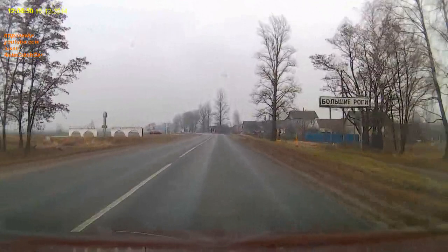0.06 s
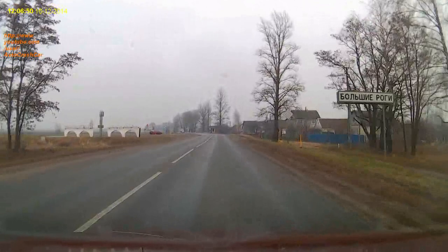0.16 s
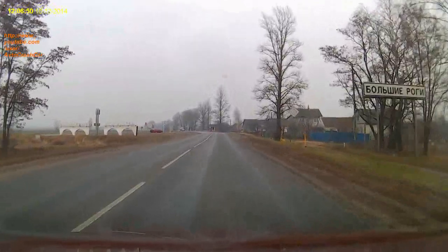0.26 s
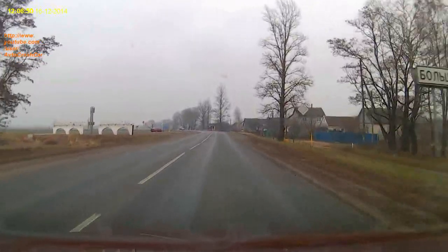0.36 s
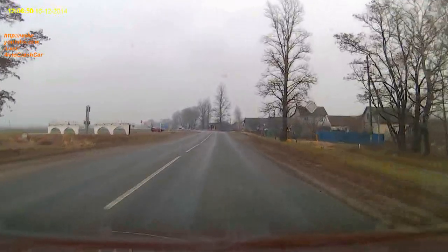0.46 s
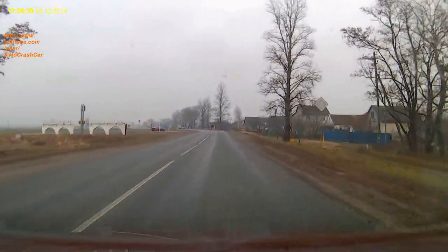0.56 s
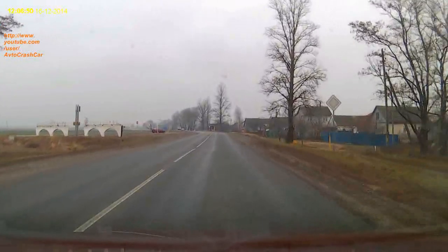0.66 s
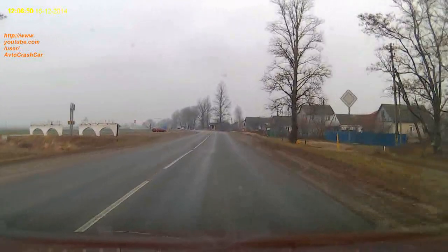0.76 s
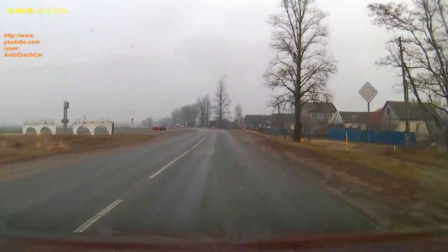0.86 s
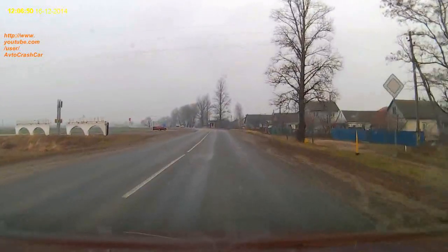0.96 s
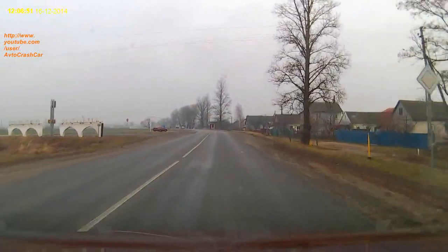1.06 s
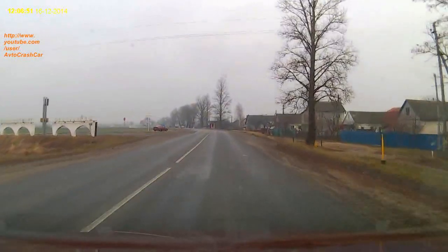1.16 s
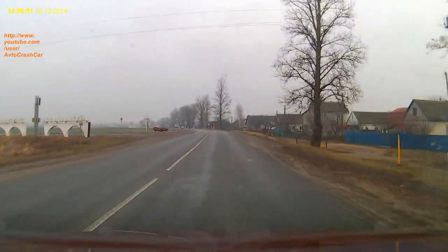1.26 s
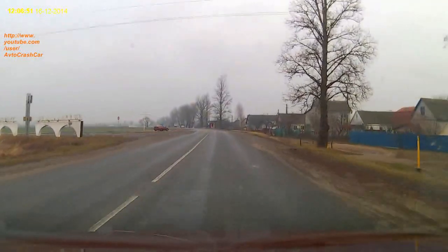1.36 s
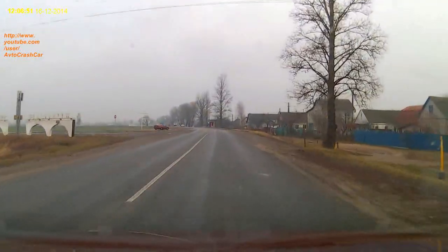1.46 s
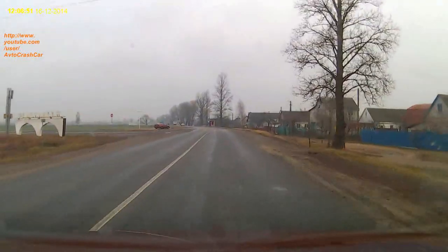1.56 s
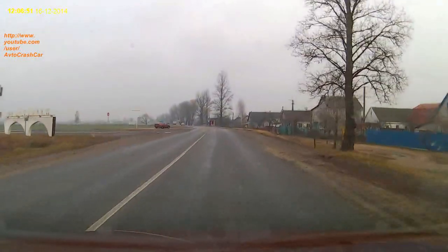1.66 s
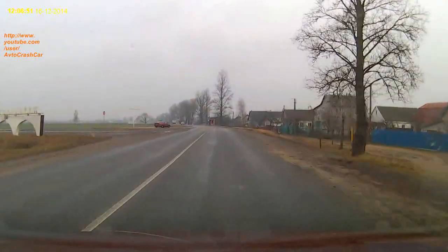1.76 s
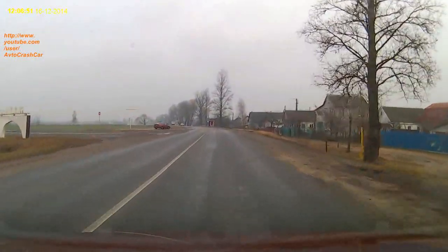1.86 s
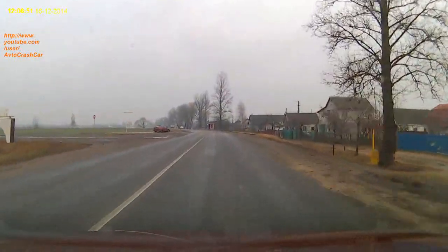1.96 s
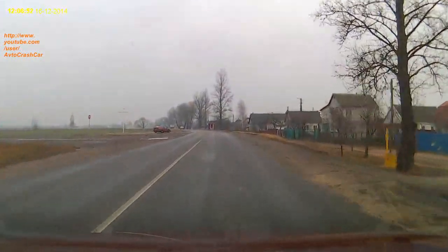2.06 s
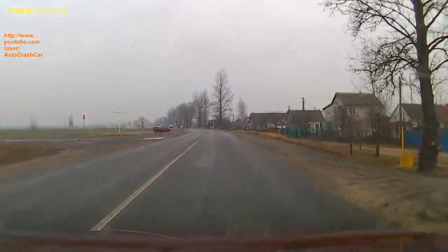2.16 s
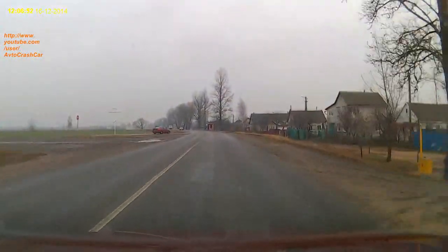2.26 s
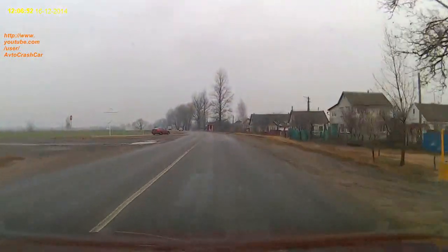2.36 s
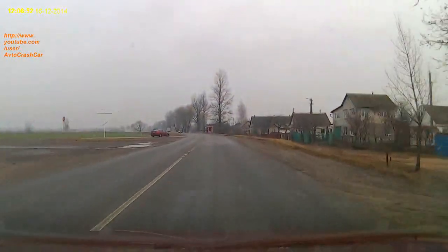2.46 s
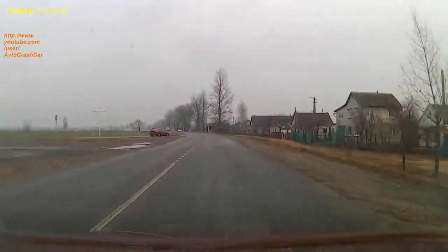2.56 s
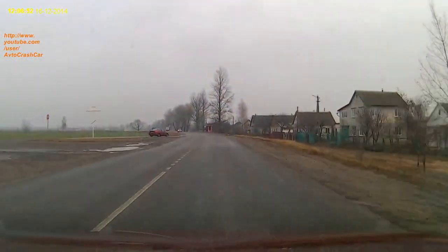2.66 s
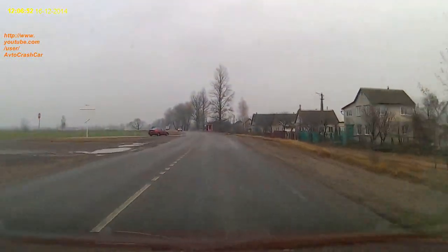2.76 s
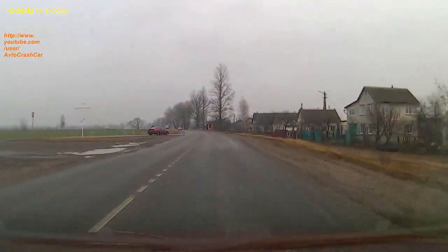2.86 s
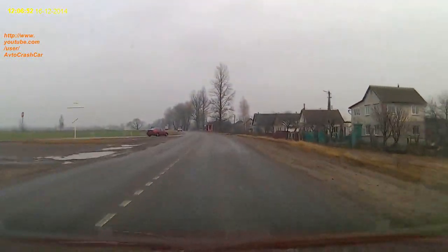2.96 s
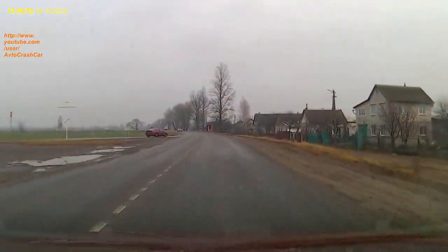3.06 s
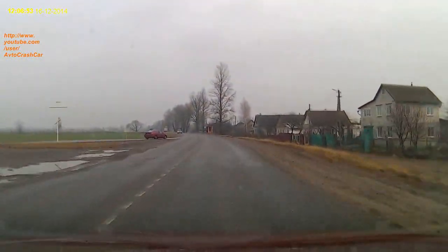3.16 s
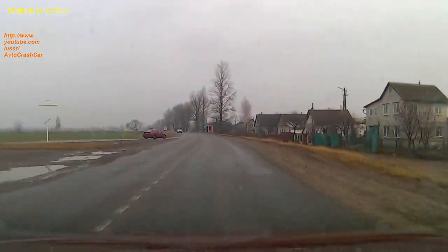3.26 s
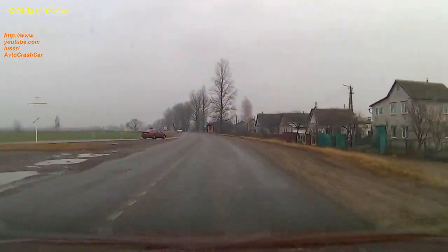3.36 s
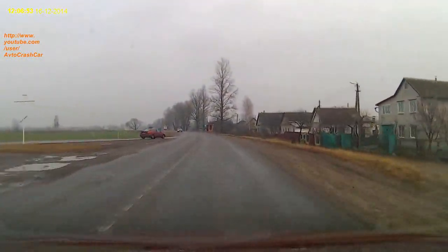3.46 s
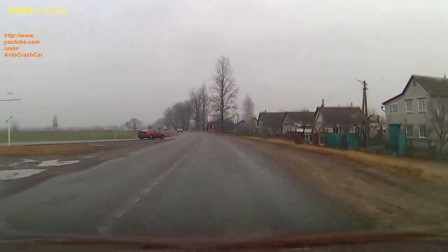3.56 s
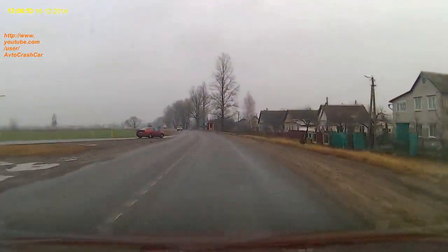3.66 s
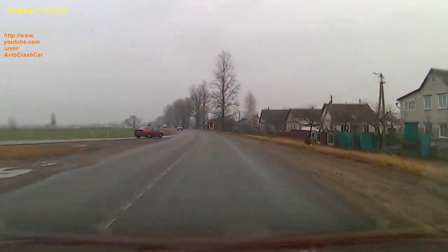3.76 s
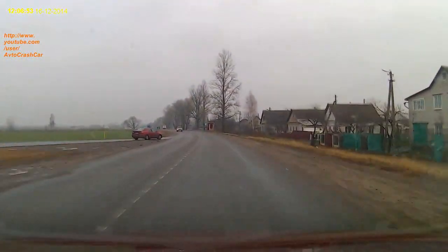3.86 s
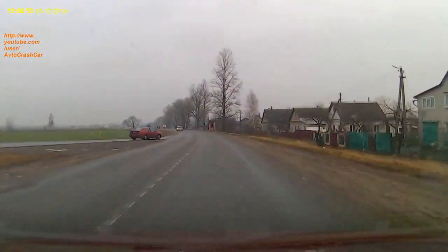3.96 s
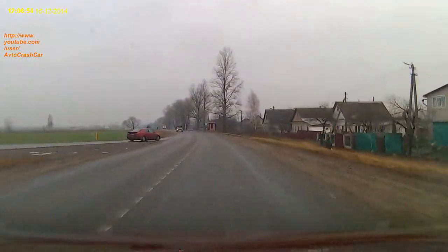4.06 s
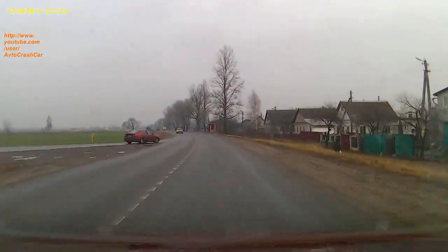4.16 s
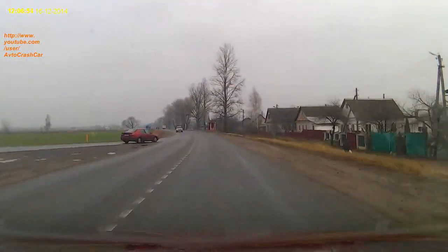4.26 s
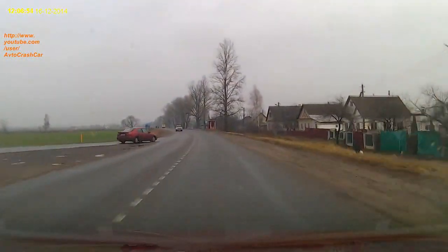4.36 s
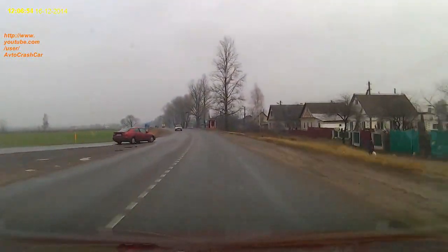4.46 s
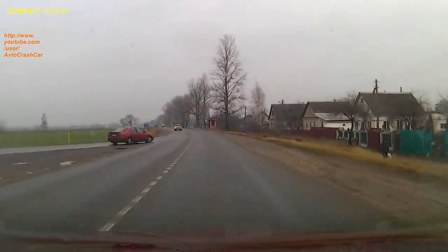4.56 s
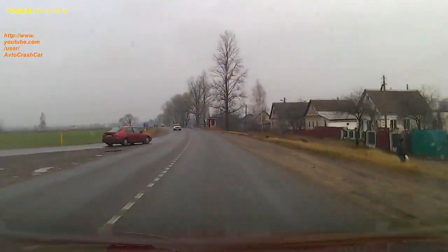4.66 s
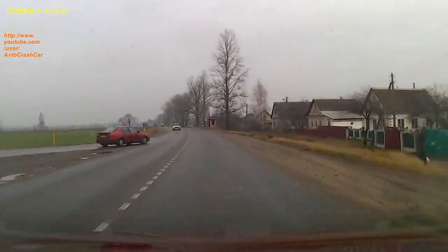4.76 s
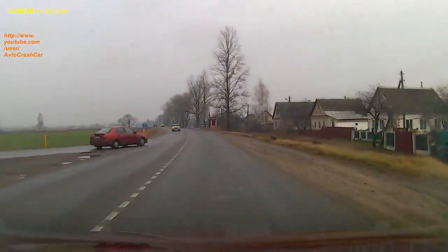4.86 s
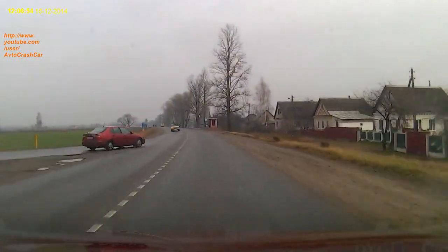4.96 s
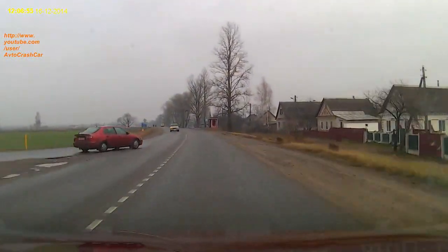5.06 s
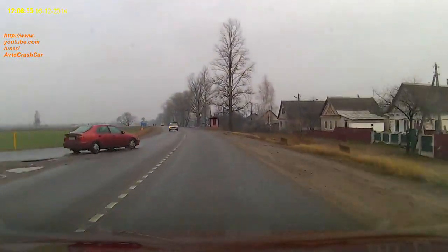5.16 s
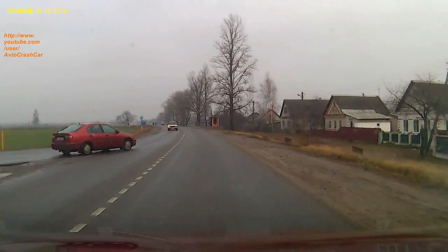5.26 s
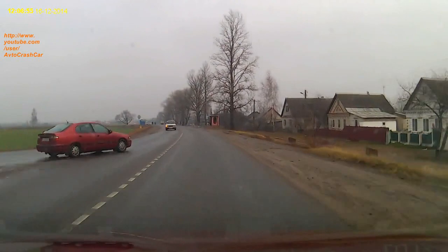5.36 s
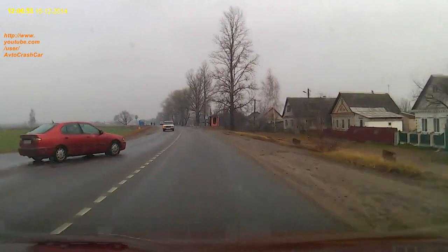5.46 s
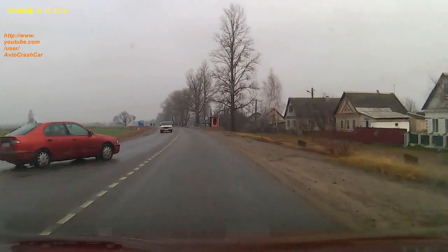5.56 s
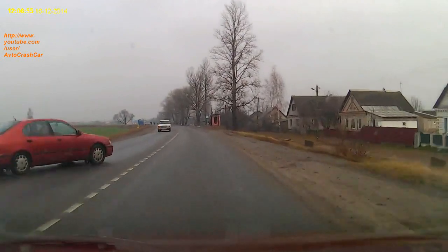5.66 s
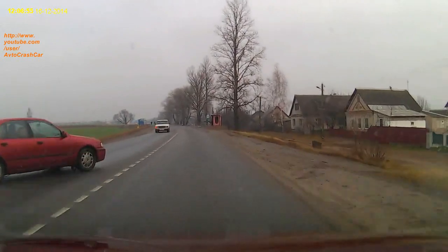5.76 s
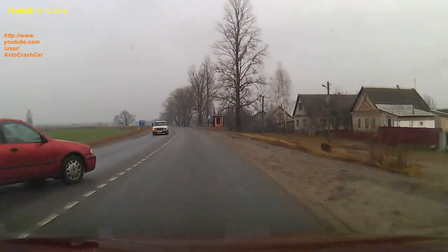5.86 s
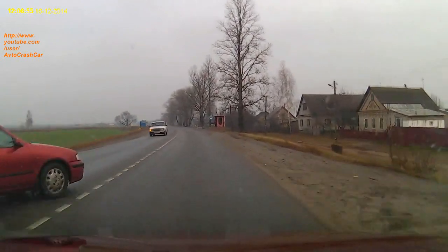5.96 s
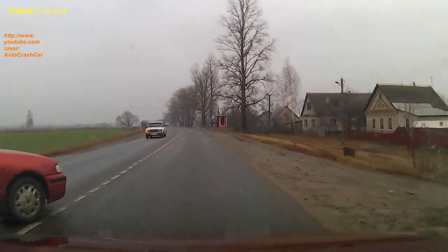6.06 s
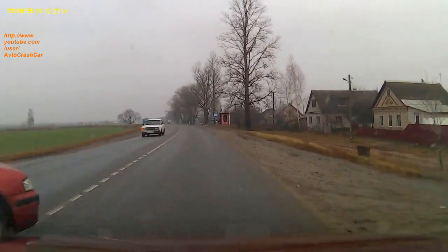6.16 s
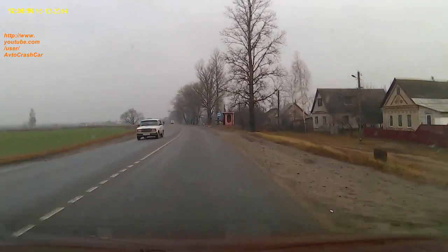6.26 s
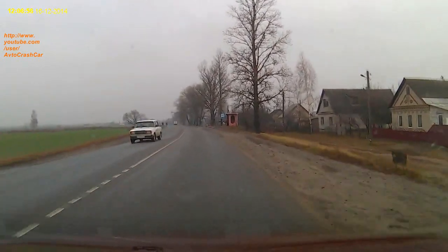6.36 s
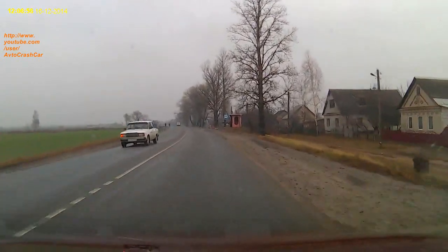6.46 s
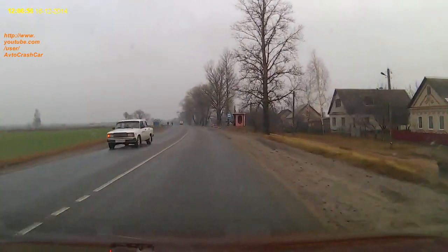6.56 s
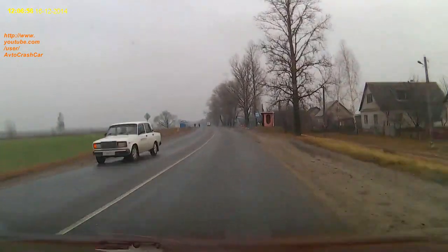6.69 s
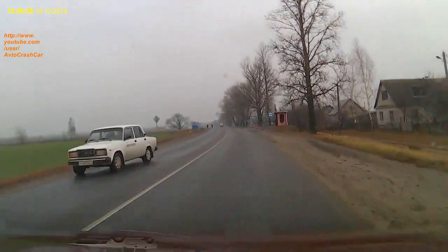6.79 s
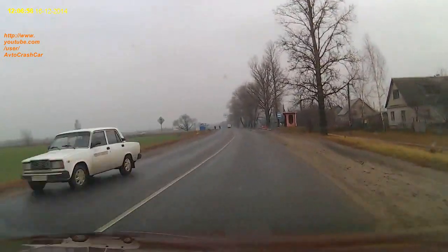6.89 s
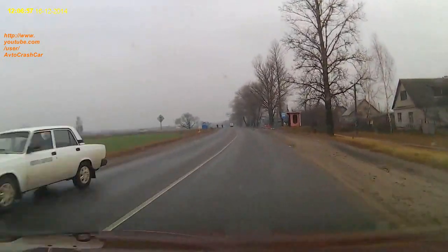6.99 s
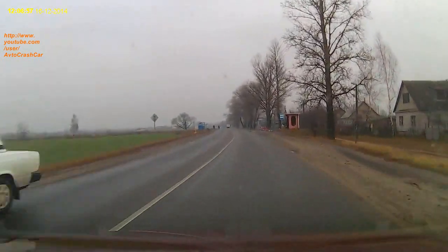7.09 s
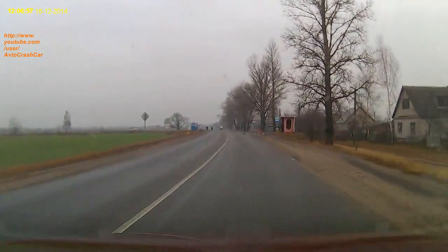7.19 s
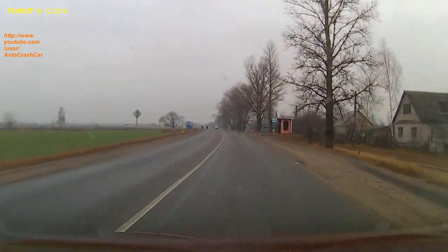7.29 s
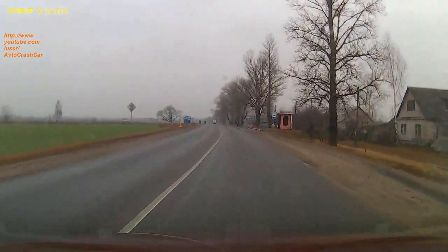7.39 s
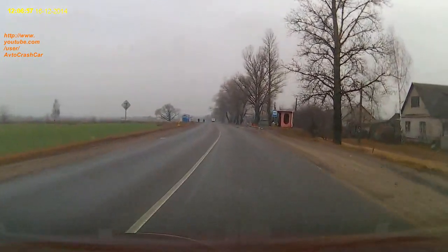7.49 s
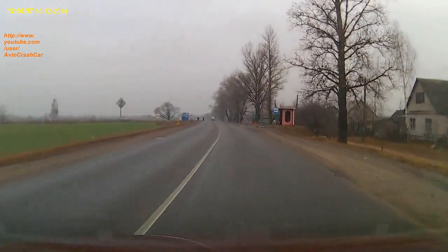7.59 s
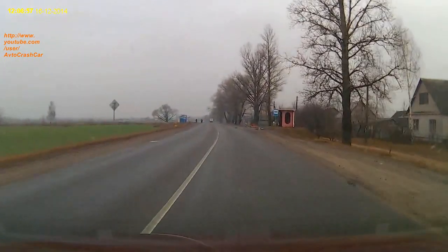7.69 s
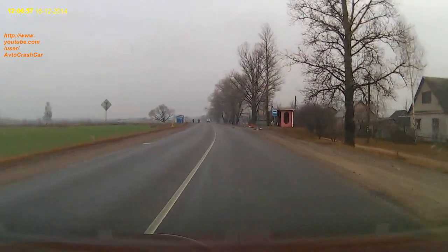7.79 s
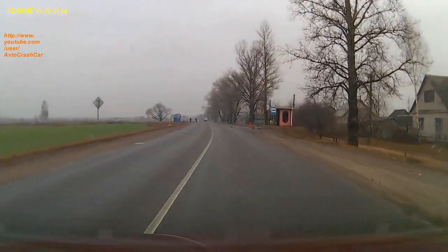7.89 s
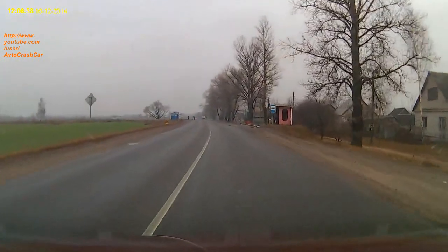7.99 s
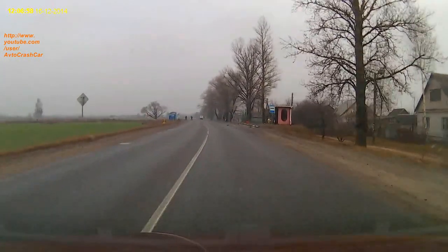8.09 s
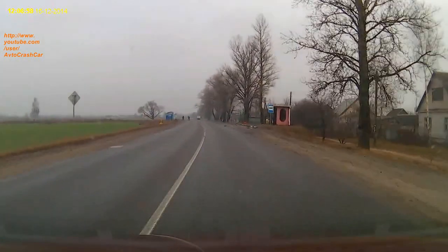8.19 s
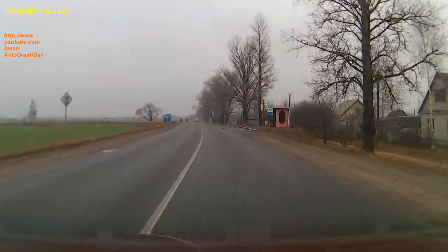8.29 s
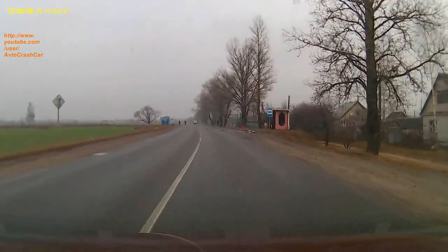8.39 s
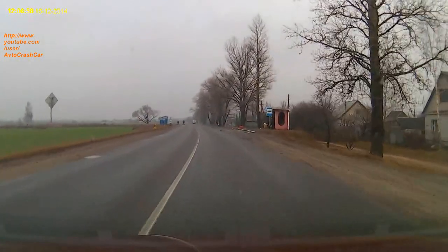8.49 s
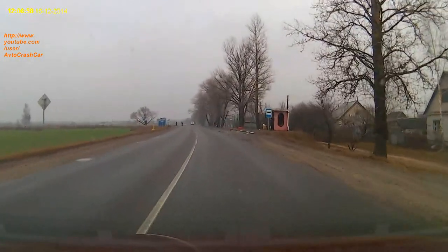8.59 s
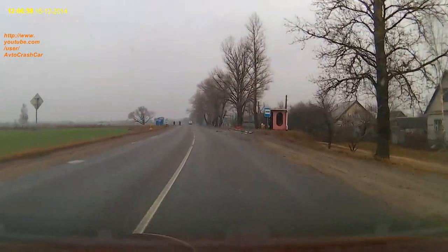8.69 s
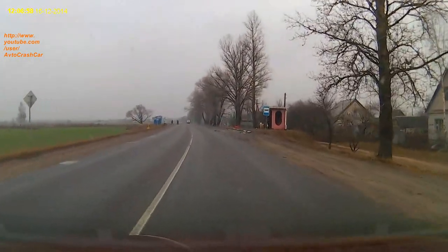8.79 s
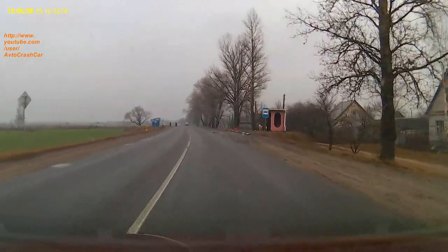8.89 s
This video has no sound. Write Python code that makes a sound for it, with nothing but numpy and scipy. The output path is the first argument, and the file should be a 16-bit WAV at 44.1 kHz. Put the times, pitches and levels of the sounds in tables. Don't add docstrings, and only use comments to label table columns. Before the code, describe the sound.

Inside a car, steady tyre roar and a faint trim buzz, a two-tone horn, a crunching metal scrape, then rapid clattering slaps and floor thumps.

```python
import sys
import numpy as np
from scipy import signal
from scipy.fft import rfft, irfft
from scipy.io import wavfile

SR = 44100
rng = np.random.default_rng(int(sys.argv[2]) if len(sys.argv) > 2 else 0)


def to_linear_factor(level_db):
    exponent = np.asarray(level_db, float) / 20
    return 10 ** exponent


def pcm_store(signal):
    levels = np.round(np.clip(np.atleast_2d(signal), -1, 1) * 32767)
    wavfile.write(sys.argv[1], SR, levels.astype(np.int16).T)


N = 393813

HORN_S, HORN_RISE_S, HORN_HOLD_S, HORN_FALL_S = 5.645, 0.051, 0.698, 0.03
HIT_S, PART_S = 6.413, 6.655
BOUNCE_S = 0.0082


def rms_one(x):
    return x / np.sqrt(np.mean(x ** 2) + 1e-20)


def in_time(rows):
    s, *columns = np.transpose(rows)
    return [np.interp(np.arange(N) / SR, s, c) for c in columns]


def during(rows):
    t = np.arange(N) / SR
    return (t >= rows[0][0]) & (t <= rows[-1][0])


def shape_db(start, rise, hold, fall):
    s = np.cumsum([start, 1e-4, max(rise, 1e-3), max(hold, 1e-3), max(fall, 1e-3), 1e-4])
    return np.interp(np.arange(N) / SR, s, [-200, -40, 0, 0, -40, -200])


def drift(rate):
    r = np.exp(-2 * np.pi * rate / SR)
    return rms_one(signal.lfilter([1], [1, -2 * r, r * r], rng.standard_normal(N + SR))[SR:])


def colour(x, spectrum):
    hz, level_db = np.transpose(spectrum)
    grid = np.maximum(np.fft.rfftfreq(8192, 1 / SR), 1)
    cepstrum = irfft(np.log(to_linear_factor(np.interp(np.log(grid), np.log(hz), level_db))))
    cepstrum[1:4096] *= 2
    cepstrum[4097:] = 0
    response = irfft(np.exp(rfft(cepstrum)))
    return signal.fftconvolve(x, response / np.sqrt(np.sum(response ** 2)))[:N]


def resonate(x, modes):
    out = 0
    for k, (hz, width, level_db) in enumerate(modes):
        r = np.exp(-np.pi * width / SR)
        a = [1, -2 * r * np.cos(2 * np.pi * hz / SR), r * r]
        b = np.array([1, 0, -1]) * (1 - r * r) / 2
        out = out + (-1) ** k * to_linear_factor(level_db) * signal.lfilter(b, a, x + 1e-18)
    return out


def resonate_twice(x, mode):
    hz, width, _ = mode
    return resonate(resonate(x, [mode]), [(hz, width, 0)])


def dull(x, hz):
    return signal.sosfilt(signal.butter(4, hz, fs=SR, output="sos"), x)


def grains(per_s, spread_db):
    sizes = to_linear_factor(spread_db * np.minimum(rng.exponential(1, N), 4)) * rng.choice([-1, 1], N)
    return sizes * (rng.random(N) < per_s / SR)


def beats(hz, wander):
    cycles = np.cumsum(hz * (1 + wander * drift(40)) / SR)
    return np.diff(np.floor(cycles), prepend=0) > 0


def clicks_at(times, level_db):
    out = np.zeros(N)
    out[np.round(np.array(times) * SR).astype(int)] = to_linear_factor(level_db)
    return out


def die_away(x, t60):
    return signal.lfilter([1], [1, -to_linear_factor(-60 / (t60 * SR))], x + 1e-18)


def bursts(times, level_db, t60, click):
    start = clicks_at(times, level_db)
    puff = signal.lfilter([0.03], [1, -0.97], die_away(start, t60))
    return click * start + puff * rng.standard_normal(N)


# time_s, level_db
ROAD = [(0.0, -24), (0.76, -25), (1.6, -24.5), (1.9, -23), (3.2, -24), (4.2, -26), (4.5, -24),
        (5.01, -27.5), (5.56, -26), (6.38, -22), (6.85, -28), (7.13, -26), (8.07, -28), (8.93, -30)]
# pitch_hz, level_db (per Hz)
ROAR_TONE = [(150, -35.5), (250, -8), (356, -5.5), (389, -5), (526, -3.5), (598, -7.5), (929, 0.5),
             (986, 0.5), (1640, -4.5), (2180, -30.5), (2600, -28.5), (3380, -54), (5720, -120)]
RUMBLE_TONE = [(12, -53), (20, -1), (44, 4), (75, -5.5), (130, -1), (162, -4.5), (219, 0.5), (420, -13.5),
               (550, -25), (920, -120)]
HISS_TONE = [(1100, -26), (1900, -5), (2200, -15), (2980, -2.5), (4000, -22), (5300, -24), (6600, -26),
             (7300, -48.5), (9300, -28.5), (11000, -43.5), (13000, -28.5), (16000, -50)]
# pitch_hz, width_hz, level_db
CABIN = [(911, 10, -11.5), (1045.5, 17, -3.5)]


def road():
    (roar_db,), t = in_time(ROAD), np.arange(N) / SR
    wobble_db = np.clip(13.5 * (t - 6.87), 0, 15)
    honking = to_linear_factor(shape_db(HORN_S, HORN_RISE_S, HORN_HOLD_S, HORN_FALL_S))
    leak_db = 7 * (t > HIT_S) + 5 * honking
    surface = drift(2)
    rumble_db = roar_db - 7 + wobble_db + 1.3 * drift(15)
    hiss_db = roar_db - 21 + leak_db + 1.2 * surface + 1.5 * drift(12)
    tread, body, air = rng.standard_normal((3, N))
    roar = rms_one(colour(tread + 3.7 * resonate(tread, CABIN), ROAR_TONE))
    rumble = colour(body, RUMBLE_TONE)
    hiss = colour(air + 0.63 * rms_one(grains(370, spread_db=4.5)), HISS_TONE)
    return to_linear_factor(roar_db - 0.5 + surface / 2) * roar + to_linear_factor(rumble_db) * rumble + to_linear_factor(hiss_db) * hiss


CLIP_TONE = [(2600, -51.5), (4400, -3.5), (5200, -6.5), (5600, -0.5), (6400, 10.5), (6900, 0.5),
             (7300, -42.5), (8100, -35.5), (8700, -6.5), (9200, -10.5), (10000, -7), (11000, -37),
             (22000, -100)]
# start_s, length_s, level_db
BUZZ = [(0.0, 0.54, -54.5), (0.625, 0.38, -55.5), (1.256, .09, -56), (1.422, 0.2, -50.5),
        (1.696, .41, -51.5), (2.168, 1.67, -49), (3.988, .27, -52.5), (4.334, 0.3, -51),
        (4.733, .48, -52.5), (1.697, 0.0092, -42), (5.4, .9, -61.5)]


def loose_clip():
    shaking = np.clip(0.7 + 0.4 * drift(45) + 0.35 * drift(12), 0.02, 1.1)
    hits = beats(138, wander=0.2) * shaking * to_linear_factor(1.5 * rng.standard_normal(N))
    chatter = signal.lfilter([1], [1, -0.92], hits + 1e-18) * rng.standard_normal(N)
    slap_s, blow_db = np.transpose(SLAPS + GRAZES)[:2]
    jolted = die_away(clicks_at(slap_s, blow_db - 28), t60=0.15)
    edge_s, spells = 0.03, 0
    for start, length, level_db in BUZZ:
        spells = spells + to_linear_factor(level_db + shape_db(start - edge_s, edge_s, length, edge_s))
    return colour((spells + jolted) * rms_one(chatter), CLIP_TONE)


# pitch_hz, level_db (per Hz)
CRACK_TONE = [(700, -20), (1400, 1.5), (2170, -6), (3000, -0.5), (4000, -13.5), (5100, -10), (6400, -14),
              (8200, -25.5), (9300, -19.5), (10700, -37), (12300, -15.5), (16000, -37)]
# pitch_hz, width_hz, level_db
TRIM = [(2670, 1930, -3), (3150, 620, -0.5), (4320, 370, -7), (4950, 510, -7.5)]


def cracks(table, t60):
    s, level_db = np.transpose(table)
    snap_db = level_db - 5 + 0.47 * (level_db + 12.5)
    out = colour(bursts(s, snap_db, t60, click=8.1), CRACK_TONE)
    piece = rng.integers(0, len(TRIM), len(s))
    for k, mode in enumerate(TRIM):
        struck = bursts(s[piece == k], level_db[piece == k] + 6.5, t60, click=4.3)
        out += resonate_twice(struck, mode)
    return out


# time_s, peak_db
TICKS = [(0.398, -29), (0.5625, -21.5), (1.5795, -18), (1.613, -22.5), (1.7933, -35), (1.838, -23),
         (1.937, -18.5), (1.953, -30), (2.9835, -25), (4.5044, -18), (4.996, -27.5), (5.3797, -20),
         (5.5126, -20.5)]


def ticks():
    return to_linear_factor(-0.5) * signal.lfilter(*signal.butter(2, 5200, fs=SR), cracks(TICKS, t60=0.049))


def diaphragm(hz, partials, level_db, drive_db=0):
    phase = 2 * np.pi * np.cumsum(hz * (1 + 0.0009 * drift(25))) / SR
    out = 0
    for multiple, part_db in partials:
        waver_db = min(0.53 + multiple / 4, 2.5) * drift(19)
        late_db = 0.16 * multiple * drive_db
        gain = np.sqrt(2) * to_linear_factor(level_db + part_db + late_db + waver_db)
        out = out + gain * np.sin(round(multiple) * phase)
    return out


# multiple (of the horn's pitch), level_db
LOW_HORN = [(1, 0.5), (2, -17), (8, -8.5), (10, -14), (11, -27)]
HIGH_HORN = [(1, -1), (2, -15.5), (3, -11), (4, -30), (6, -11.5), (7, -8.5), (8, -32)]
# pitch_hz, width_hz, level_db
DISC = [(3160, 80, -6), (2620, 60, -11.5), (2950, 300, -5)]


def horns():
    low_db, high_db, disc_db = (shape_db(HORN_S + lag, HORN_RISE_S, HORN_HOLD_S - lag, HORN_FALL_S)
                                for lag in (0, 0.01, 0.025))
    disc = rms_one(dull(resonate(rng.standard_normal(N), DISC), 4200))
    low = diaphragm(345.7, LOW_HORN, low_db - 25.5, low_db)
    high = diaphragm(448.1, HIGH_HORN, high_db - 19, high_db)
    return low + high + to_linear_factor(disc_db - 34.5) * disc


# time_s, factor
DOPPLER = [
    (5.72, 1.014),
    (5.9, 1.002),
    (6.07, .991),
    (6.2, .979),
    (6.3, .958),
    (6.41, .91),
]
# multiple (of the horn's pitch), level_db
FAR_LOW = [(8, -3), (9, 3), (10, -9)]
FAR_HIGH = [(7, 2.5), (8, -24), (9, -28)]


def swell_db(top_db, top_s):
    t = np.arange(N) / SR
    shade_db = np.minimum(60 * (t - top_s), 10.5)
    return top_db - np.where(t < top_s, 72 * (top_s - t), shade_db)


def crossing_horns():
    (doppler,) = in_time(DOPPLER)
    low = diaphragm(366.2 * doppler, FAR_LOW, swell_db(-28, top_s=6.17))
    high = diaphragm(406.4 * doppler, FAR_HIGH, swell_db(-25, top_s=5.98))
    return (low + high) * during(DOPPLER)


# time_s, level_db
CRUNCH = [
    (6.413, -43),
    (6.418, -2),
    (6.431, -9),
    (6.475, 4.5),
    (6.52, -2.5),
    (6.56, -3.5),
    (6.59, -1.5),
    (6.645, -3.5),
    (6.69, -30),
]
# pitch_hz, width_hz, level_db
PANEL = [(665, 140, -17.5), (950, 410, -10), (1255, 190, -7), (1543, 370, -16.5), (467, 174, -12.5)]
# pitch_hz, level_db (per Hz)
GRIT_TONE = [(1000, -49), (1700, -1), (2710, 5.5), (2970, 10.5), (4200, -1), (7140, -8), (9260, -77),
             (10500, -61), (12500, -38.5), (15800, -80)]


def crunch():
    (panel_db,), t = in_time(CRUNCH), np.arange(N) / SR
    since = np.maximum(t - HIT_S, 0)
    slips = rms_one(grains(2500, spread_db=6))
    panel = rms_one(resonate(slips * to_linear_factor(2.5 * drift(70)), PANEL))
    rise_s = 0.034
    grit_db = -5 - 50 * since + shape_db(HIT_S, rise_s, PART_S - HIT_S - rise_s, 0.036)
    judder = 0.75 * np.clip((t - 6.48) / 0.065, 0, 1)
    shudders = signal.lfilter([1], [1, -0.97], beats(140.6, wander=0.23))
    pulses = rms_one(shudders * rng.standard_normal(N))
    grit = colour((1 - judder) * slips + judder * pulses, GRIT_TONE)
    shards_db = -40.5 + shape_db(PART_S, 0.02, 6.97 - PART_S, 0.1)
    shards = colour(rms_one(grains(790, spread_db=2)), CRACK_TONE)
    body = [(40.4, 17.5, 0.5), (74, 55, -3), (231, 510, -12.0)]
    thud = rms_one(dull(resonate(rng.standard_normal(N), body), 580))
    thud_gain = to_linear_factor(-5.5 - 60 * since / 0.04) + to_linear_factor(-9.5 - 39.5 * since)
    thud_gain = thud_gain * np.minimum(since / 0.0053, 1)
    return (to_linear_factor(panel_db) * panel * during(CRUNCH) + to_linear_factor(grit_db) * grit
            + thud_gain * thud + to_linear_factor(shards_db) * shards)


# pitch_hz, level_db (per Hz)
KNOCK_TONE = [(180, -11.5), (300, -6), (379, -5.5), (495, 7), (1200, 3), (1410, -1), (2200, -15),
              (2860, -24), (4840, -120)]


def knocks(table):
    s, level_db, ring_hz = np.transpose(table)
    out = colour(bursts(s, level_db - 8.5, t60=0.11, click=8.1), KNOCK_TONE)
    t = np.arange(2000) / SR
    shape = (1 - np.exp(-t / 0.0017)) * to_linear_factor(-60 * t / 0.05)
    for start, gain, hz in zip(np.round(s * SR).astype(int), to_linear_factor(level_db - 0.5), ring_hz):
        ring = gain * shape * np.sin(2 * np.pi * hz * t)
        out[start:start + len(t)] += ring[:N - start]
    return out


# time_s, knock_db, ring_hz, crack_db
DEBRIS = [(6.416, -4, 1194, -23), (6.424, -8, 810, -12), (6.434, -6, 1280, -10), (6.683, -30, 1100, -26),
          (6.7, -5, 1320, -34), (6.74, -17, 1360, -27), (6.757, -9, 1440, -15.5), (6.774, -12.5, 950, -40),
          (6.793, -12, 978, -21), (6.807, -28, 978, -20), (6.871, -30, 800, -25), (6.892, -5.5, 806, -25),
          (6.914, -30, 666, -22), (7.004, -13.5, 523, -40), (7.047, -13, 480, -37),
          (7.088, -17.5, 770, -33), (7.136, -13.5, 840, -24), (7.152, -16, 1029, -40),
          (7.186, -9.5, 1235, -18.5), (7.216, -13, 486, -20)]


def debris():
    s, knock_db, ring_hz, crack_db = np.transpose(DEBRIS)
    touches = np.concatenate([np.c_[s, crack_db], np.c_[s + BOUNCE_S, crack_db - 5]])
    return knocks(np.c_[s, knock_db, ring_hz]) + cracks(touches, t60=0.024)


# time_s, blow_db, crack_db, ring_hz, rattle_s
SLAPS = [(7.383, -16.5, -18, 533, 0.018), (7.413, -15, -23.5, 1270, 0.036), (7.52, -14, -21, 504, .015),
         (7.591, -12, -21, 487, 0.0077), (7.646, -14, -26, 490, 0.028), (7.826, -15, -18, 520, 0.033),
         (7.893, -7, -9, 1255, 0.032), (7.95, -12.5, -23, 560, .025), (8.011, -24, -18.5, 850, 0.014),
         (8.276, -2, -6, 752, .05), (8.379, -12.5, -17, 480, 0.017), (8.444, -6, -7, 850, .03),
         (8.6, -7.5, -12, 508, 0.038), (8.745, -18.5, -19, 676, 0.024), (8.778, -20, -19.5, 600, 0.014),
         (8.892, -19, -18.5, 1380, .02), (8.918, -17.5, -18, 867, 0.012)]
GRAZES = [(7.322, -7.5, -15.5, 456, 0.011), (7.461, -15, -14, 510, .01), (7.691, -12.5, -23, 1446, .015),
          (7.754, -13, -20.5, 504, .02), (7.985, -9.5, -9.5, 1084, 0.011), (8.046, -4.5, -9.5, 824, 0.024),
          (8.115, -12, -14.5, 1340, 0.018), (8.212, -10.5, -10.5, 540, 0.019),
          (8.35, -14.5, -18, 865, 0.011), (8.519, -11.5, -10.5, 1400, 0.0073), (8.666, -9, -14, 840, 0.013),
          (8.727, -13, -13, 503, 0.014), (8.812, -10.5, -10.5, 515, 0.017), (8.874, -18, -20.5, 770, .01)]
# pitch_hz, width_hz, level_db
FLOOR = [(111.5, 27, 7.5), (172, 64, 5), (235, 119, 2.5), (308, 32, -30)]


def slaps():
    s, blow_db, crack_db, ring_hz, rattle_s = np.array(SLAPS + GRAZES).T[:, :, None]
    grazed = np.arange(len(s))[:, None] >= len(SLAPS)
    order = np.arange(-2, 7)
    after = BOUNCE_S * (order + rng.uniform(-0.25, 0.25, (len(s), 9))) * (order != 0)
    lead_loss = np.where(grazed, 2.5, 11) / BOUNCE_S ** 2
    loss_db = np.where(after > 0, 8.5 / rattle_s ** 2, lead_loss) * after ** 2
    uneven_db = 2.9 * rng.exponential(1, after.shape) * (after > 0)
    touches = np.c_[(s + after).ravel(), (crack_db - loss_db - uneven_db).ravel()]
    knock_s = s - 0.00295 * grazed
    thump_s = s - 0.00807 * grazed
    rebound_hz = 470 * to_linear_factor(rng.uniform(0, 9, s.shape))
    blows = np.concatenate([np.c_[knock_s, blow_db, ring_hz],
                            np.c_[knock_s + 0.015, blow_db - 8, rebound_hz]])
    thump = resonate(bursts(thump_s[:, 0], blow_db[:, 0] + 20, t60=0.027, click=4.1), FLOOR)
    end_s = (N - 1) / SR
    return (cracks(touches[touches[:, 0] < end_s], t60=0.029)
            + knocks(blows[blows[:, 0] < end_s]) + dull(thump, 730))


def scene():
    return (road() + loose_clip() + ticks() + horns() + crossing_horns() + crunch() + debris() + slaps())[None]


def roll_off(x):
    return signal.sosfilt(signal.butter(12, 15900, fs=SR, output="sos"), x)


# pitch_hz, width_hz, level_db
HIGH_BAND = [(13000, 1000, -18.5)]


def record(dry):
    top, treble_hz = 0.62, 9750
    flat = dry / (1 + np.abs(dry / top) ** 6) ** (1 / 6)
    drooped = signal.lfilter(*signal.butter(1, 56, "high", fs=SR), flat)
    heard = dull(dull(drooped, treble_hz), treble_hz) + resonate_twice(drooped, HIGH_BAND[0])
    heard = heard / (1 + np.abs(heard / 0.96) ** 16) ** (1 / 16)
    return roll_off(heard)


dry = scene()
out = record(dry)
pcm_store(out)
```